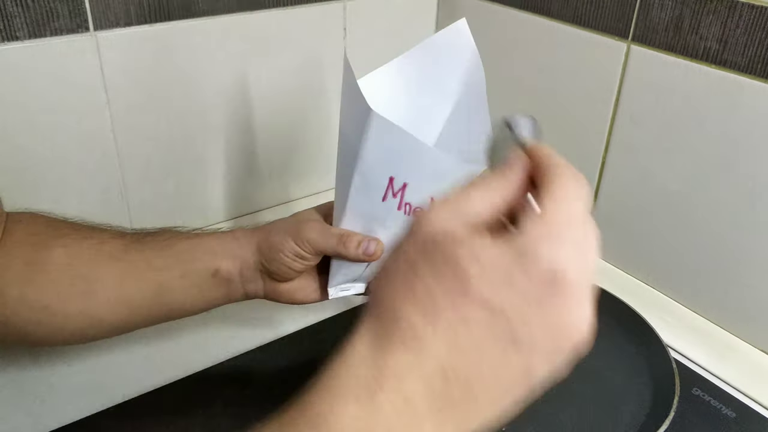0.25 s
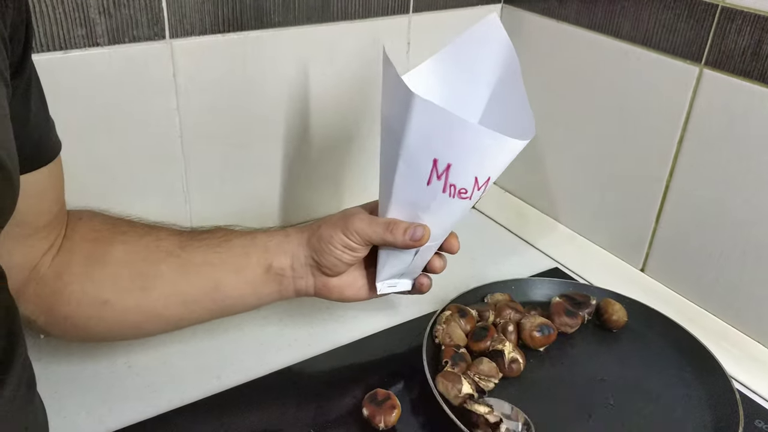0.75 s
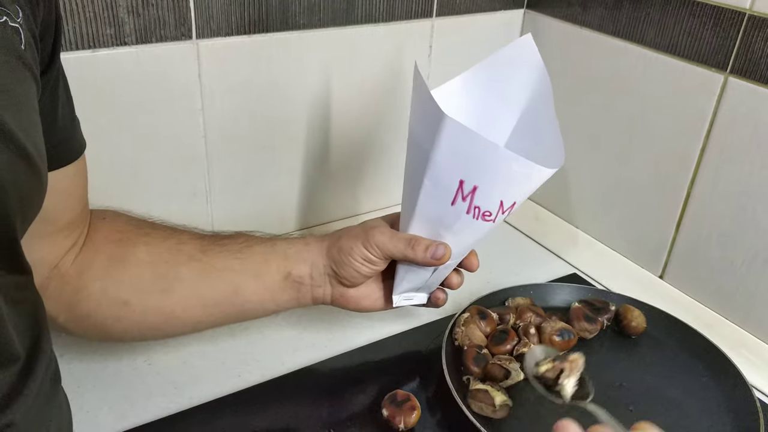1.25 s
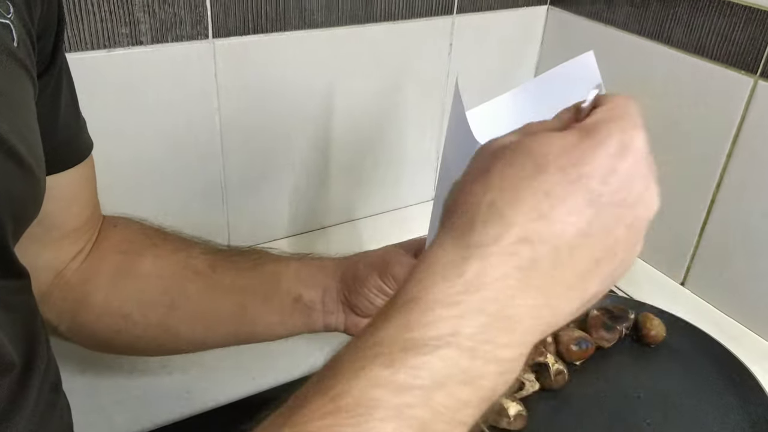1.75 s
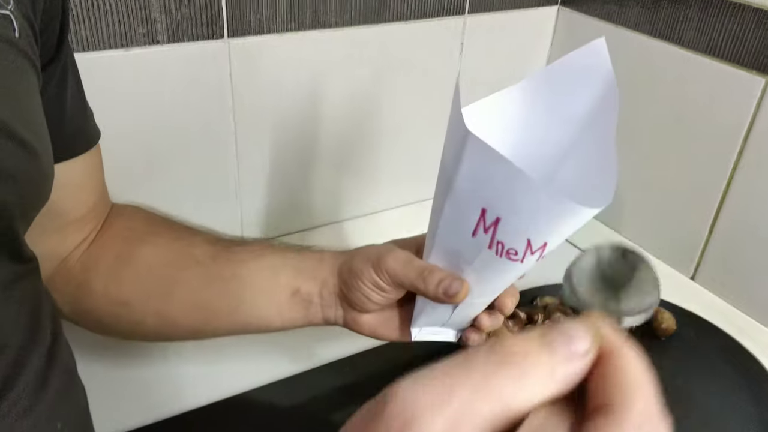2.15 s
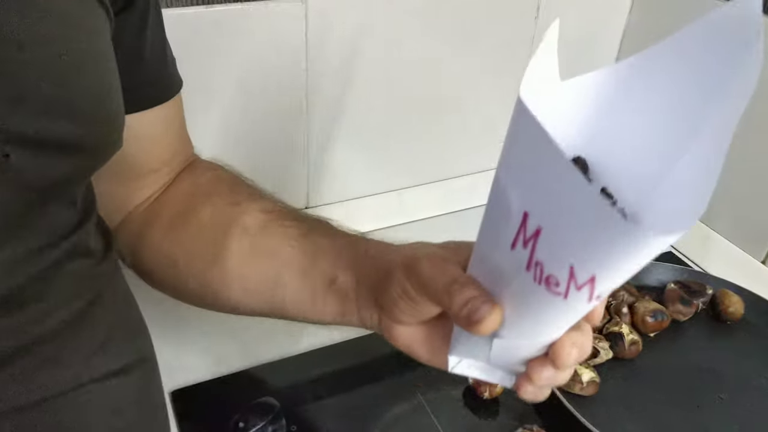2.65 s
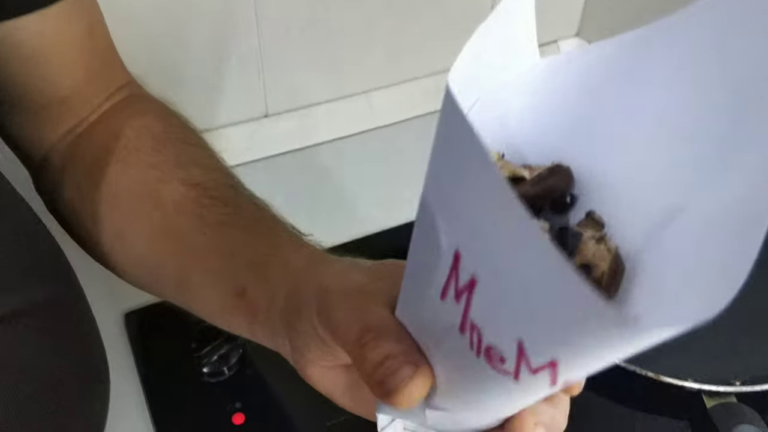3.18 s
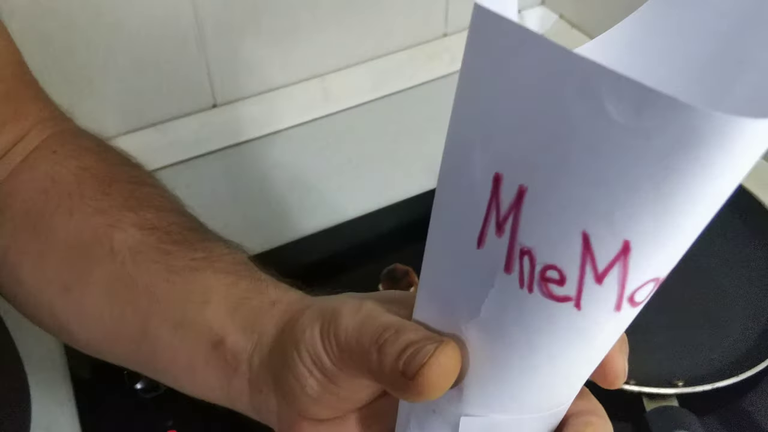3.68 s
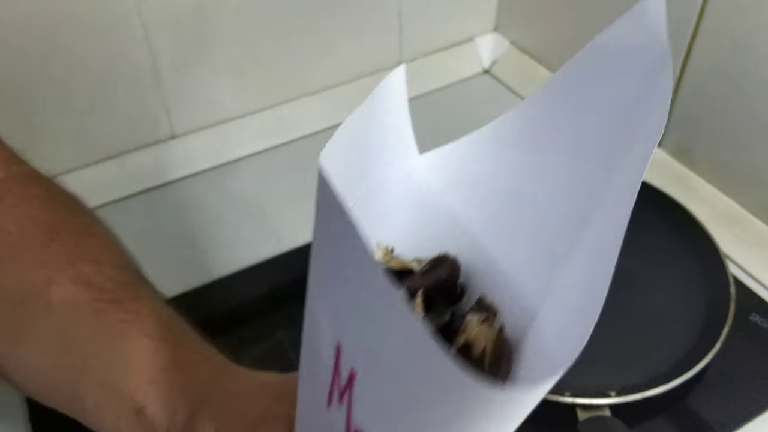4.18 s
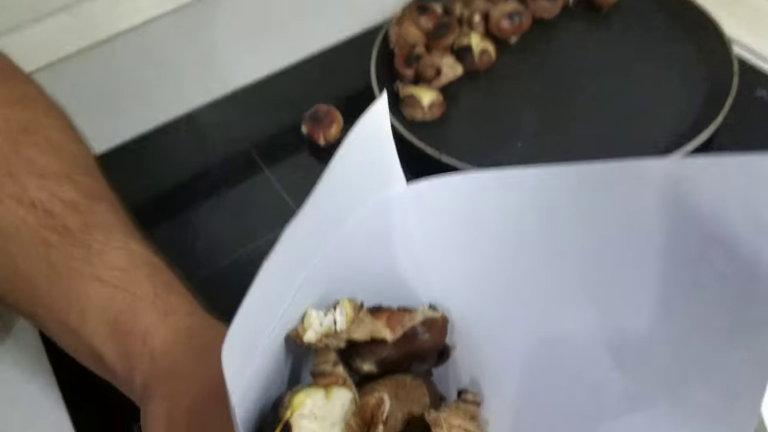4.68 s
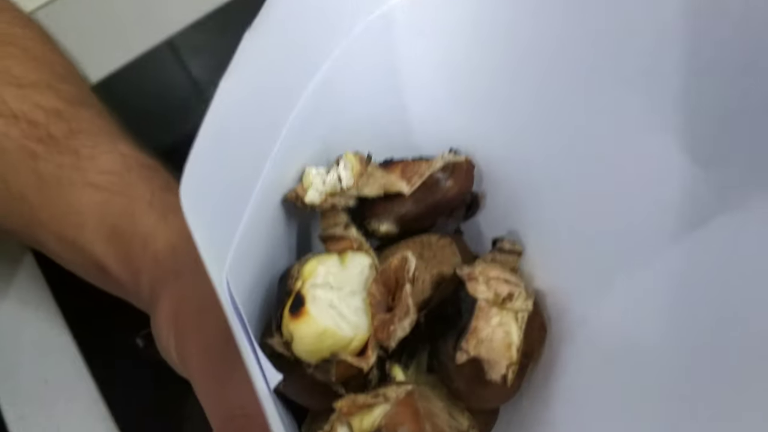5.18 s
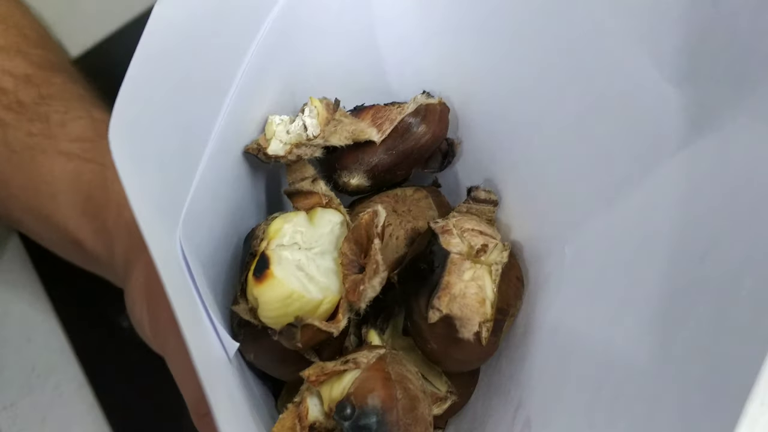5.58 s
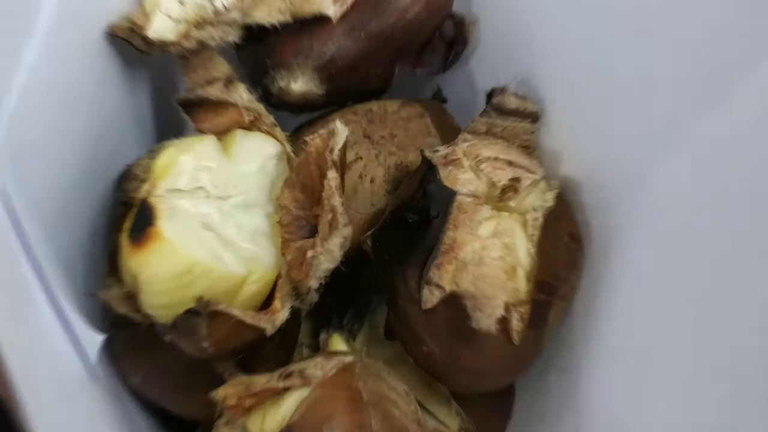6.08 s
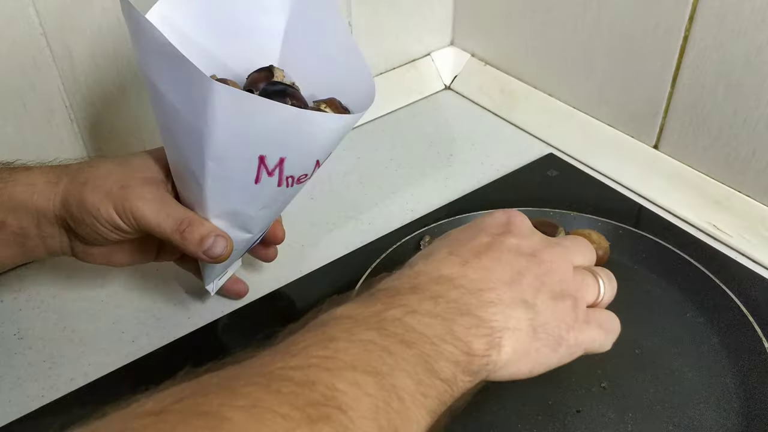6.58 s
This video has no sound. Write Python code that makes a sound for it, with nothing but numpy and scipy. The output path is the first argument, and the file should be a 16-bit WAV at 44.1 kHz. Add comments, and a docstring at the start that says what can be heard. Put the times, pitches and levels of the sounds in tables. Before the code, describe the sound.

A handheld stereo microphone sits near a pan in a hard, lightly echoing kitchen. Crackly nuts hit paper, a spoon rings on the pan, and nuts knock and slide. Sparse shell ticks lead to a second, lighter drop into the cone. Then quiet hollow paper rubs, a sharp spoon knock on the worktop, rumbling microphone thumps, a fade almost to silence, an abrupt return and a brief rummage among brittle shells.

```python
"""Roasted chestnuts are spooned from a frying pan into a paper cone in a small tiled kitchen.
Nuts thud and shells rustle (noise bursts); the spoon clinks on the pan (ringing tones) and nuts tumble in it.
Nuts land in the cone, faint whistles glide, the cone is tilted (rubbing noise) and the spoon is put down.
The microphone is bumped (low thumps) while the level fades away; it jumps part of the way back and recovers,
as a hand rummages among the dry shells. Room tone, a soft hiss with a thin whine, lies beneath."""
import sys
import numpy as np
from scipy import signal
from scipy.fft import rfft, irfft, next_fast_len
from scipy.io import wavfile

SR = 44100
rng = np.random.default_rng(int(sys.argv[2]) if len(sys.argv) > 2 else 0)


def unload_wav(signal):
    """Save mono or channel-first audio to the path in sys.argv[1] as 16-bit WAV at rate SR, clipped to [-1, 1]."""
    wavfile.write(
        sys.argv[1],
        SR,
        np.round(np.clip(np.atleast_2d(signal).T, -1, 1) * 32767).astype(np.int16),
    )


N = 301634
TIME = np.arange(N) / SR
TICK_T60_S = 0.035   # time for a shell's tick to die by 60 dB

# The colours below say how strong a noise is at each pitch: (frequency [Hz], relative level per Hz [dB])
# the pan's first crack, which also colours its upper modes: (frequency [Hz], relative level per Hz [dB])
PAN_CRACK_COLOUR = [(250, -8.5), (750, -13), (1300, -3.5), (2200, -7), (2850, -8), (3200, -1.5), (4900, 2),
                    (5400, -8), (6100, -13), (6800, 3), (8500, 0), (9500, -10), (12500, -14), (14500, -28)]
# nuts hitting paper, and slips on the pan: (frequency [Hz], relative level per Hz [dB])
THUD_COLOUR = [(500, -1.5), (2500, -15.5), (8000, -5.5), (14000, -5)]
# sharp ticks and swishes of shells, and the spoon's crack: (frequency [Hz], relative level per Hz [dB])
TICK_NOISE_COLOUR = [(500, -14.5), (3000, -7.5), (5000, -3), (8500, 5), (14000, -6)]
# shells rubbing and snapping: (frequency [Hz], relative level per Hz [dB])
SHELL_RUB_COLOUR = [(60, -15.5), (250, -8.5), (550, -6.5), (720, -9), (1000, -14), (1200, -15.5),
                    (2300, -11.5), (3000, -12.5), (5000, -13), (7700, -10), (14000, -16)]
# crack of the worktop and of the small click: (frequency [Hz], relative level per Hz [dB])
WORKTOP_CRACK_COLOUR = [(150, -6), (650, 3), (1150, 0), (2100, 1.5), (2900, -11), (3800, -3), (5500, -10.5),
                        (7300, -2), (11000, -9), (14500, -16)]


def from_db(db):
    """Turn decibels into a plain gain."""
    return 10 ** (np.asarray(db) / 20)


def rms_one(x):
    """Scale a sound to an average (rms) strength of 1."""
    return x / np.sqrt(np.mean(x ** 2) + 1e-20)


def at_hz(points, hz):
    """Read a table on a log-frequency axis, as the ear spaces pitches."""
    points = np.array(points)
    return np.interp(np.log(hz + 1), np.log(points[:, 0]), points[:, 1])


def butter(x, hz, kind, order=2):
    """Smooth filter that keeps the lows, the highs or a band."""
    edge_hz = np.clip(hz, 10, SR / 2 - 500)
    sos = signal.butter(order, edge_hz, kind, fs=SR, output="sos")
    return signal.sosfilt(sos, x + 1e-18)


def colour(x, spectrum, size=8192):
    """Causal (minimum-phase) filter that shapes the spectrum but keeps the power of white noise."""
    wanted_db = at_hz(spectrum, np.fft.rfftfreq(size, 1 / SR))
    cepstrum = irfft(np.log(from_db(wanted_db)))
    # folding the cepstrum onto its first half puts the energy as early as possible
    response = irfft(np.exp(rfft(2 * cepstrum[:size // 2], size)))
    return signal.oaconvolve(x, response / np.linalg.norm(response))[:len(x)]


def drift(rate):
    """Random wander: straight lines between normal random values, `rate` of them a second."""
    knots = rng.standard_normal(int(rate * N / SR) + 2)
    return np.interp(TIME * rate, np.arange(len(knots)), knots)


def fade(t, t60):
    """Even dying away: 60 dB weaker after t60 seconds."""
    return np.exp(-np.log(1000) * t / t60)


def add(out, s, sound):
    """Mix a sound in at a given time in seconds."""
    start = max(0, round(s * SR))
    out[start:start + len(sound)] += sound[:N - start]


def burst(t, t60):
    """The noise of one contact: builds within a millisecond or so, then dies."""
    contact_s = 0.0006
    return rng.standard_normal(len(t)) * fade(t, t60) * (1 - np.exp(-t / contact_s))


def ring(modes, vary_db):
    """A struck body rings at several pitches (modes), each dying on its own and with a chance strength."""
    t = TIME[:SR // 3]
    sizes = from_db(np.clip(vary_db, 0, 3) * rng.standard_normal(len(modes)))
    out = 0
    for k, (hz, db, t60) in enumerate(modes):
        sign = (-1) ** k
        out = out + sign * sizes[k] * from_db(db) * np.sin(2 * np.pi * hz * t) * fade(t, t60)
    return out


def strike(hits, modes, crack, crack_db, crack_t60):
    """Each blow rings the modes and a brief crack; a soft contact passes only the lows."""
    out, t = np.zeros(N), TIME[:SR // 3]
    for s, level_db, contact_hz in hits:
        snap = from_db(crack_db) * butter(colour(burst(t, crack_t60), crack), 100, "high")
        body = butter(ring(modes, vary_db=2.0), contact_hz, "low", order=3)
        add(out, s, from_db(level_db) * (body + butter(snap, contact_hz, "low")))
    return out


def friction(spectrum, per_s, spread_db, flutter_db):
    """Rubbing is many tiny slips of uneven size, whose level flutters at random; rms 1."""
    sizes = from_db(spread_db * np.minimum(rng.exponential(1, N), 4))
    slips = (rng.random(N) < per_s / SR) * rng.standard_normal(N) * sizes
    return rms_one(colour(slips, spectrum) * from_db(flutter_db * drift(110)))


def stroke(s, hold_s, level_db, shape):
    """Gain of one rubbing movement: swells to its level at s, sags while held, dies away."""
    attack_s, sag_db, release_s = shape   # attack and release each span 60 dB
    t, hold_s = TIME - s, max(hold_s, 1 / SR)
    swell = fade(np.maximum(-t, 0), attack_s)
    stop = fade(np.maximum(t - hold_s, 0), release_s)
    return from_db(level_db - sag_db * np.clip(t / hold_s, 0, 1)) * swell * stop


def strokes(rows, shape):
    """Gain of a run of strokes; overlapping ones add in power."""
    return np.sqrt(sum(stroke(*row, shape) ** 2 for row in rows))


def pan():
    """The spoon's edge excites every mode; tumbling and sliding nuts only the low ones, while shells clack."""
    # the spoon strikes the pan: (time [s], strength [dB], contact bandwidth [Hz])
    spoon_blows = [(0.5626, -13, 13800), (0.569, -23.5, 8860)]
    # nuts knock on the pan: (time [s], strength [dB], contact bandwidth [Hz])
    nut_knocks = [(0.693, -19.5, 804), (0.7345, -21.5, 1190), (0.743, -19, 1080), (0.8115, -20.5, 1010),
                  (0.82, -18.5, 730), (1.171, -16, 515), (1.1968, -14.5, 820), (1.243, -26, 1130),
                  (1.261, -28.5, 1130)]
    # ring of the pan: (frequency [Hz], level [dB], time to die by 60 dB [s])
    pan_modes = [(117.8, -15, 0.2), (371, -25, 0.1), (684, -18, 0.097), (788, -16.5, 0.055),
                 (1179, -14.5, 0.08), (1237, -16.5, 0.073), (1726, -22.5, 0.15), (2543, -14.5, 0.15),
                 (2586, -16, 0.14), (3065, -21.5, 0.13), (3760, -25, 0.14), (7157, -23.5, 0.16),
                 (7550, -28.5, 0.18)]
    # hard shells clack together: (time [s], strength [dB])
    clacks = [(0.7345, -31.5), (0.742, -30.5), (0.8115, -32)]
    # sound of a clack: (frequency [Hz], relative level per Hz [dB])
    clack_colour = [(700, -3), (2300, -4.5), (4400, -9.5), (6500, -22.5)]
    # nuts are pushed over the pan: (time [s], hold [s], level [dB])
    shoves = [(0.695, 0.03, -39), (0.84, 0.039, -42.5), (0.93, 0.11, -57.5), (1.115, 0.03, -47),
              (1.205, 0.045, -41.5)]
    # course of every shove: (attack [s], sag [dB], release [s])
    shove_shape = (.22, 3, .24)

    blows = strike(spoon_blows, pan_modes, PAN_CRACK_COLOUR, crack_db=3.0, crack_t60=0.038)
    blows += strike(nut_knocks, pan_modes, clack_colour, crack_db=-10.5, crack_t60=0.044)
    upper = shimmer()
    for s, level_db, _ in spoon_blows:
        add(blows, s, from_db(level_db) * upper)
    for s, level_db in clacks:
        add(blows, s, from_db(level_db) * colour(burst(TIME[:SR // 10], TICK_T60_S), clack_colour))

    slips = friction(THUD_COLOUR, per_s=1400, spread_db=-0.5, flutter_db=2.5)
    slips = butter(slips, 1350, "low", order=6)
    ringing = signal.oaconvolve(slips, ring(pan_modes, vary_db=0))[:N]   # every slip rings the pan
    scrape = rms_one(butter(ringing, 90, "high"))
    grit = rms_one(butter(slips, [170, 900], "band"))   # dull, unpitched part of the scrape
    return blows + strokes(shoves, shove_shape) * (from_db(-4.5) * scrape + from_db(-7.0) * grit)


def shimmer(count=140):
    """The pan's crowded upper modes, at chance pitches, dying evenly."""
    # these many weak modes: (lowest [Hz], highest [Hz], level [dB], time to die by 60 dB [s])
    low_hz, high_hz, level_db, t60 = (2901, 8800, -25.5, 0.45)
    modes = [(hz, 0, t60) for hz in rng.uniform(low_hz, high_hz, count)]
    return from_db(level_db) * colour(ring(modes, vary_db=1.5), PAN_CRACK_COLOUR) / np.sqrt(count)


def paper():
    """Everything that sounds in and around the cone."""
    return cone() + shells()


def cone():
    """Nuts thud into the paper; each slide mixes a dry rub with the hollow note of the cone."""
    # nuts landing in the cone: (time [s], strength [dB], contact bandwidth [Hz])
    landings = [(0.031, -25.5, 3500), (0.041, -25.5, 13800), (0.1365, -27.5, 1780), (1.775, -40.5, 9050),
                (1.792, -34, 700), (1.836, -38.5, 4500), (1.921, -36.5, 12600), (1.929, -34, 814)]
    # ring of the cone: (frequency [Hz], level [dB], time to die by 60 dB [s])
    cone_modes = [(128, -20, 0.35), (258, -14, 0.12), (360, -18, 0.054), (720, -19, 0.06),
                  (1192, -14, .035), (1450, -13, 0.018)]
    # the cone slides in the hand: (time [s], hold [s], level [dB], hollow share of the power [0-1])
    slides = [(2.913, 0.037, -50, 0.26), (2.986, 0.048, -44.5, 0.5), (3.077, 0.036, -48, 0.13),
              (3.194, 0.059, -44, 0.95), (3.361, 0.078, -51.5, 0.84), (3.796, 0.025, -55.5, 0.06)]
    # course of every slide: (attack [s], sag [dB], release [s])
    slide_shape = (0.16, 3.45, 0.34)
    # the dry rub: (frequency [Hz], relative level per Hz [dB])
    dry_colour = [(100, -8.5), (300, 4.5), (500, -7.5), (800, -7.5), (1000, -3), (1200, -2.5), (2000, -5),
                  (2450, -5), (3100, -10.5), (6000, -14), (9000, -9), (14000, -24)]
    # the hollow note: (frequency [Hz], relative level per Hz [dB])
    hollow_colour = [(150, -21.5), (380, -9.5), (600, -8), (720, -2.5), (1000, -15.5), (1200, -10),
                     (1700, -16.5), (3000, -24.5), (10000, -28)]

    thuds = strike(landings, cone_modes, THUD_COLOUR, crack_db=-1.0, crack_t60=0.062)
    dry_rub = friction(dry_colour, per_s=2200, spread_db=0.0, flutter_db=1.0)
    hollow_rub = friction(hollow_colour, per_s=2200, spread_db=0.0, flutter_db=1.0)
    power = np.array([stroke(s, hold_s, level_db, slide_shape) ** 2 for s, hold_s, level_db, _ in slides])
    hollow = np.clip(np.array(slides)[:, -1], 0, 1)
    return thuds + np.sqrt((1 - hollow) @ power) * dry_rub + np.sqrt(hollow @ power) * hollow_rub


def shells():
    """Brittle shells rustle, crackle, swish and grind, with single sharp ticks among them."""
    # shells rubbing on paper and on each other: (time [s], hold [s], level [dB])
    rustles = [(0, 0.0048, -31.5), (0.04, 0.056, -37.5), (0.19, 0.016, -40.5), (1.18, 0.12, -55.5),
               (1.778, 0.1, -47), (1.928, 0.0046, -48), (6.52, 0.046, -44.5), (6.59, 0.07, -49.5)]
    # light, bright swishes over paper and shell: (time [s], hold [s], level [dB])
    swishes = [(0.186, 0.011, -41), (0.85, 0.018, -51.5), (1.5, 0.19, -58.5), (5.046, .01, -57.5)]
    # the hand grinds shells against each other: (time [s], hold [s], level [dB])
    grinds = [(6.515, 0.18, -51)]
    # sound of the grinding: (frequency [Hz], relative level per Hz [dB])
    grind_colour = [(60, -18), (150, 5), (300, -3), (1000, -15), (2400, -6.5), (3500, -19), (8000, -33)]
    # course of all these movements: (attack [s], sag [dB], release [s])
    rustle_shape = (0.11, 4.9, 0.18)
    # dry shells ticking, plus the spoon's first light tick at 4.471 s: (time [s], strength [dB])
    ticks = [(0.136, -37), (0.196, -39), (1.0744, -43.5), (1.1955, -44.5), (1.307, -39.5), (1.318, -38.5),
             (1.423, -43), (1.552, -41), (1.672, -47.5), (1.7752, -32.5), (1.806, -39.5), (1.836, -38),
             (3.525, -48), (4.471, -42), (6.518, -37.5), (6.542, -45), (6.592, -38)]

    rub = friction(SHELL_RUB_COLOUR, per_s=6000, spread_db=-1.5, flutter_db=2.0)
    snaps = 0.5 * crackle(per_s=110, snap_t60=0.013)
    rustle = strokes(rustles, rustle_shape) * rms_one(rub + snaps)
    hiss = rms_one(colour(rng.standard_normal(N), TICK_NOISE_COLOUR))
    swish = strokes(swishes, rustle_shape) * hiss
    grinding = friction(grind_colour, per_s=2600, spread_db=-1.5, flutter_db=2.5)
    out = rustle + swish + strokes(grinds, rustle_shape) * grinding
    for s, level_db in ticks:
        add(out, s, from_db(level_db) * colour(burst(TIME[:SR // 10], TICK_T60_S), TICK_NOISE_COLOUR))
    return out


def crackle(per_s, snap_t60):
    """Brief snaps of uneven size at chance times, about per_s a second in each of five registers; rms 1."""
    t, edges, out = TIME[:SR // 30], np.geomspace(1000, 16000, 6), 0
    for low, high in zip(edges, edges[1:]):
        snaps = (rng.random(N) < per_s / SR) * rng.standard_normal(N)
        one_snap = butter(rng.standard_normal(len(t)) * fade(t, snap_t60), [low, high], "band", order=1)
        out = out + signal.oaconvolve(snaps, one_snap)[:N]
    return rms_one(colour(out, SHELL_RUB_COLOUR))


def spoon():
    """The spoon's short ring over the duller knock of the worktop."""
    # the spoon touches, then lands on the worktop: (time [s], strength [dB], contact bandwidth [Hz])
    spoon_touches = [(4.465, -54, 13780), (4.479, -33, 14200), (4.7945, -30, 12100)]
    # ring of the spoon: (frequency [Hz], level [dB], time to die by 60 dB [s])
    spoon_modes = [(1617, -2.5, 0.014), (1840, 0, 0.027), (3810, -14, 0.033), (5170, -5.5, 0.026),
                   (7170, -1, 0.039), (7420, -4.5, 0.024), (9200, -7.5, 0.02)]
    # knocks on the worktop: (time [s], strength [dB], contact bandwidth [Hz])
    worktop_knocks = [(4.7905, -25, 13800), (4.7945, -30, 2980), (4.8085, -30, 1980)]
    # ring of the worktop: (frequency [Hz], level [dB], time to die by 60 dB [s])
    worktop_modes = [(121.7, -14.5, 0.18), (764, -12, 0.032), (1097, -7.5, 0.045), (2014, -7.5, .05)]
    metal = strike(spoon_touches, spoon_modes, TICK_NOISE_COLOUR, crack_db=-5, crack_t60=0.056)
    wood = strike(worktop_knocks, worktop_modes, WORKTOP_CRACK_COLOUR, crack_db=0.4, crack_t60=0.11)
    return metal + wood


def click():
    """Something small and hard is touched lightly: a faint ring and crack."""
    # the touch: (time [s], strength [dB], contact bandwidth [Hz])
    touches = [(2.632, -52, 4000)]
    # its ring: (frequency [Hz], level [dB], time to die by 60 dB [s])
    click_modes = [(1640, -10, .015), (2400, 1, 0.022), (3250, 4, 0.029)]
    return strike(touches, click_modes, WORKTOP_CRACK_COLOUR, crack_db=-2, crack_t60=0.04)


def whistles():
    """Faint, thin tones that glide in an arch and waver, each with two weaker partials below it."""
    # the glides: (start [s], length [s], first pitch [Hz], last pitch [Hz], level [dB]), before the waver
    glides = [(1.53, 0.18, 11400, 12300, -63), (1.9, 0.26, 13300, 11100, -61.5),
              (3.84, 0.083, 11200, 11400, -59), (4.018, 0.13, 10460, 10040, -66),
              (6.73, 0.19, 10000, 11900, -68)]
    out = np.zeros(N)
    for s, length, from_hz, to_hz, level_db in glides:
        arch = np.sin(np.linspace(0, np.pi, int(length * SR)))   # bends the pitch and swells the level
        waver = 0.0073 * drift(574)[:len(arch)]
        hz = np.linspace(from_hz, to_hz, len(arch)) * (1 + 0.043 * arch + waver)
        phase = 2 * np.pi * np.cumsum(hz) / SR
        tone = sum(0.5 ** k * np.sin(phase * (1 - k / 7)) for k in range(3))
        add(out, s, from_db(level_db) * arch * tone)
    return out


def handling():
    """Fingers brush, rumble and thump on the microphone's case."""
    # fingers shift on the microphone: (time [s], hold [s], level [dB])
    shifts = [(4.34, 0.031, -47), (5.505, 0.077, -31), (5.64, 0.11, -44.5), (6.335, 0.24, -48.5),
              (6.55, 0.14, -41.5)]
    # sound of rumble and thumps: (frequency [Hz], relative level per Hz [dB])
    rumble_colour = [(25, 5.5), (60, -1), (130, 4.5), (180, -16.5), (300, -22.5), (1000, -49), (6000, -79)]
    # skin brushes over the case: (time [s], hold [s], level [dB])
    brushes = [(5.485, 0.079, -51.5)]
    # sound of the brushing: (frequency [Hz], relative level per Hz [dB])
    brush_colour = [(530, 3), (1000, -10), (1600, -13), (5000, -50)]
    # course of shifts and brushes: (attack [s], sag [dB], release [s])
    handling_shape = (0.1, 4.8, 0.66)
    # bumps on the case: (time [s], strength [dB], contact bandwidth [Hz])
    bumps = [(5.497, -28, 200), (5.5125, -25.5, 199), (6.342, -32, 117)]
    # ring of the case: (frequency [Hz], level [dB], time to die by 60 dB [s])
    case_modes = [(67, -4.5, 0.34), (131, -12.5, 0.15)]

    shifting = friction(rumble_colour, per_s=4200, spread_db=1.5, flutter_db=3.0)
    rumble = strokes(shifts, handling_shape) * shifting
    skin = rms_one(colour(rng.standard_normal(N), brush_colour))
    brush = strokes(brushes, handling_shape) * skin
    return rumble + brush + strike(bumps, case_modes, rumble_colour, crack_db=-6, crack_t60=0.087)


def room_tone():
    """Low rumble and soft hiss, with a faint narrow whirr and a thin wavering whine inside it."""
    # the still room: (frequency [Hz], relative level per Hz [dB])
    air_colour = [(28, -7), (48, 6), (62, -6.5), (100, 0), (165, -26), (228, -17), (340, -20.5), (600, -24),
                  (1630, -29), (2190, -27.5), (3730, -31.5), (10500, -30), (14500, -37.5)]
    # the whine: (frequency [Hz], level [dB])
    whine_hz, whine_db = (2160, -82.5)
    air_db = -58.5

    def air():
        """One random layer of air noise with the whirr in it."""
        whirr = rms_one(butter(rng.standard_normal(N), [2080, 2270], "band"))
        return colour(rng.standard_normal(N), air_colour) + from_db(-24) * whirr

    wavering_hz = whine_hz * (1 + 0.004 * drift(10))
    whine = np.sqrt(2) * np.sin(2 * np.pi * np.cumsum(wavering_hz) / SR)   # rms 1
    return from_db(air_db) * diffuse(air(), air(), apart_hz=453.7) + from_db(whine_db) * whine


def diffuse(mid, side, apart_hz):
    """Two close microphones share the bass and differ above it."""
    return mid + butter(side, apart_hz, "high", order=1) * np.array([[1], [-1]])


def scatter(x, lead_ms, side_db):
    """The lows reach the left microphone earlier; nearby surfaces add reflections that differ by side."""
    size = next_fast_len(N + SR)
    near = burst(TIME[:SR // 30], 0.028)   # reflections, dying by 60 dB in 0.028 s
    hz = np.fft.rfftfreq(size, 1 / SR)
    turn = np.clip(np.pi * hz * lead_ms / 1000, -np.pi / 6, np.pi / 6)   # half the lead on each side
    pair = irfft(rfft(x, size) * np.exp(1j * turn * np.array([[1], [-1]])), size)[:, :N]
    reflections = signal.oaconvolve(x, near / np.linalg.norm(near))[:N]
    return diffuse(pair, from_db(side_db) * reflections, apart_hz=950)


def kitchen(x, build_s):
    """Tiled walls return a dense tail, each octave dying at its own pace."""
    # echo of the room: (frequency [Hz], time to die by 60 dB [s])
    room_t60 = [(100, 1), (1500, 0.5), (7000, 0.47), (14000, 0.42)]
    t, edges, tail = TIME[:SR], np.geomspace(60, 15360, 9), 0
    for low, high in zip(edges, edges[1:]):
        noise = diffuse(*rng.standard_normal((2, SR)), apart_hz=704)
        tail = tail + butter(noise, [low, high], "band") * fade(t, at_hz(room_t60, np.sqrt(low * high)))
    tail = tail * (1 - np.exp(-t / build_s))
    return signal.fftconvolve(x[None], tail / np.linalg.norm(tail[0]), axes=1)[:, :N]


def dip():
    """The level of everything fades evenly to a floor 40 dB down, jumps part of the way back and recovers."""
    silent_at_s, fade_s = 6.172, 0.7
    return_at_s, return_db, recover_s = 6.195, -7.5, 0.35
    leaving = np.clip((silent_at_s - TIME) / fade_s, 0, 1)
    returning = from_db(return_db * np.clip(1 - (TIME - return_at_s) / recover_s, 0, 1))
    return np.maximum(leaving + returning * (TIME > return_at_s), from_db(-40))


def scene():
    """Pan and spoon are point sources, the rustling paper a broad one; handling and room tone lie under them."""
    struck = pan()
    laid = spoon() + click()
    rustling = paper() + whistles()
    points = scatter(struck, lead_ms=0.36, side_db=-4.0) + scatter(laid, lead_ms=0.092, side_db=-0.5)
    broad = diffuse(rustling, paper(), apart_hz=700)   # a second random paper sound sets the sides apart
    direct = from_db(-2.5) * (points + broad)
    into_room = from_db(-9.0) * struck + from_db(-11.5) * laid + from_db(-7.0) * rustling
    echo = kitchen(into_room, build_s=0.002)
    return (direct + echo + handling() + room_tone()) * dip()


def record(dry):
    """The left microphone is the brighter one; a steep filter cuts the top."""
    # balance of the microphones: (frequency [Hz], left minus right [dB])
    lean = [(4000, 0.28), (8500, 0), (10500, 5), (14000, 4.5)]
    cutoff_hz = 14350
    size = next_fast_len(N + SR)
    lean_db = at_hz(lean, np.fft.rfftfreq(size, 1 / SR)) * np.array([[0.5], [-0.5]])
    heard = irfft(rfft(dry, size) * from_db(lean_db), size)[:, :N]
    top_cut = signal.ellip(10, 0.3, 80, cutoff_hz, fs=SR, output="sos")
    return signal.sosfilt(top_cut, heard)


dry = scene()
out = record(dry)
unload_wav(out)
```